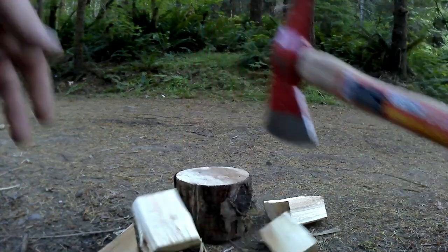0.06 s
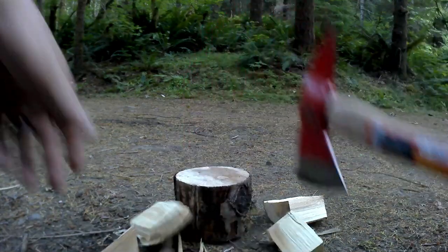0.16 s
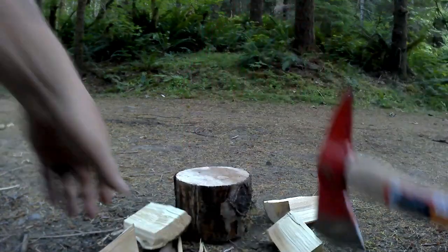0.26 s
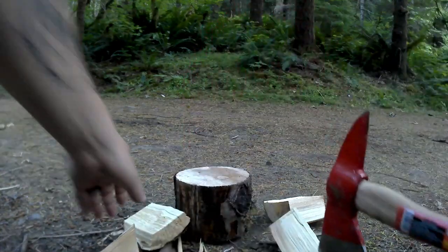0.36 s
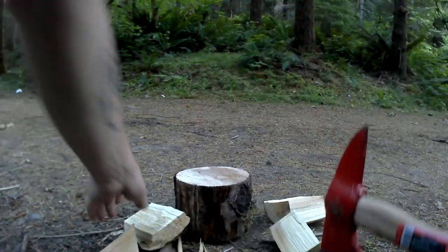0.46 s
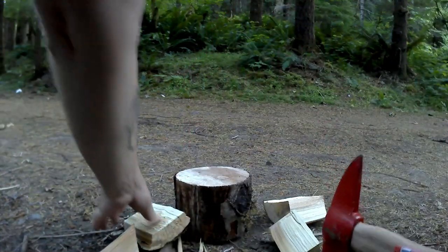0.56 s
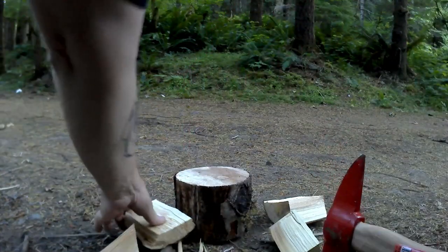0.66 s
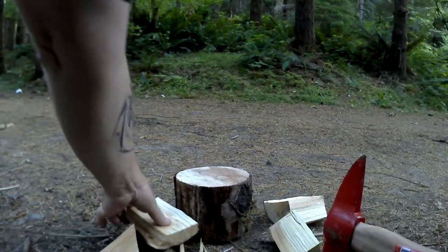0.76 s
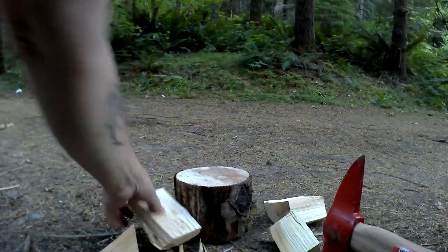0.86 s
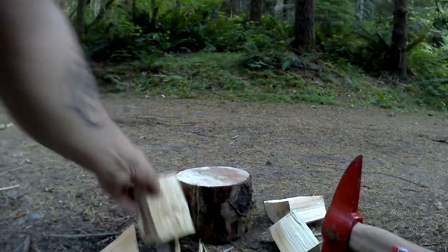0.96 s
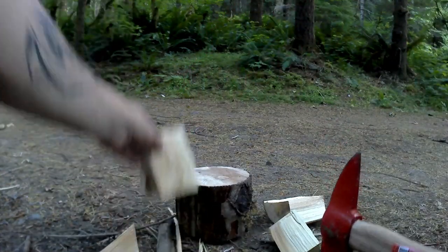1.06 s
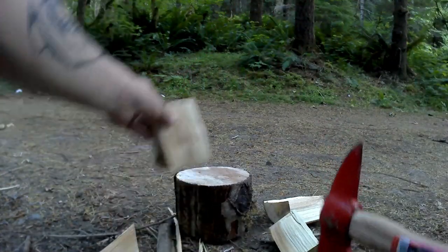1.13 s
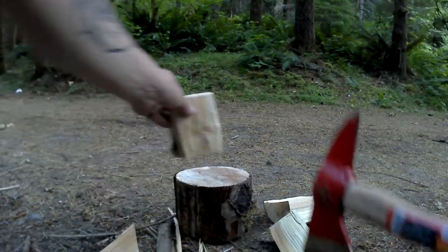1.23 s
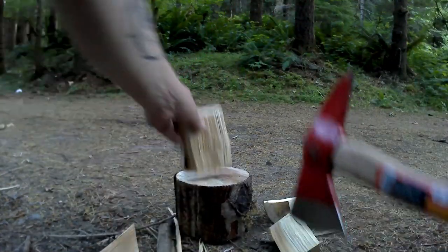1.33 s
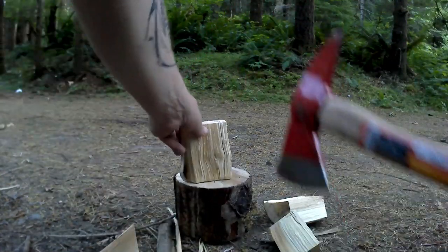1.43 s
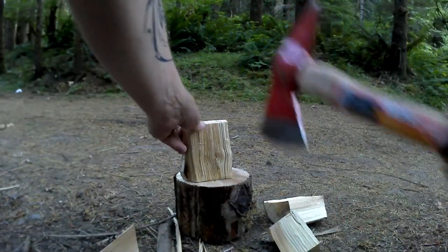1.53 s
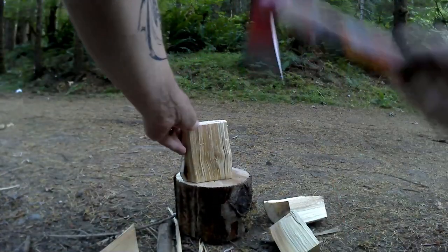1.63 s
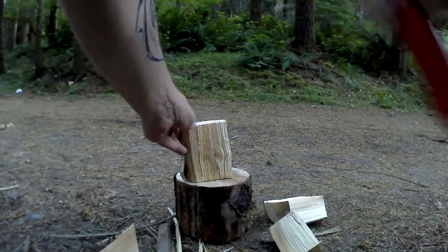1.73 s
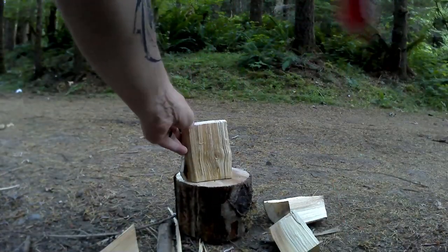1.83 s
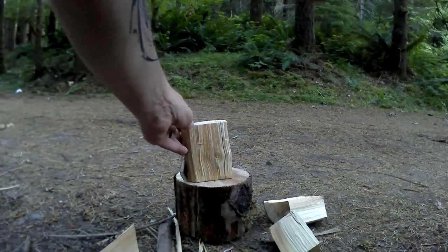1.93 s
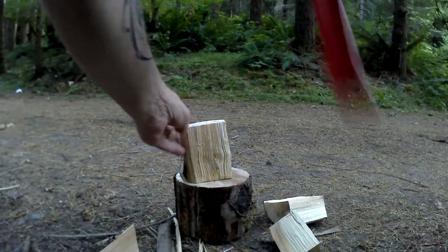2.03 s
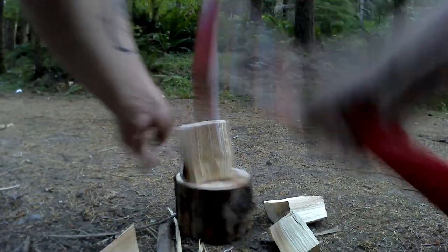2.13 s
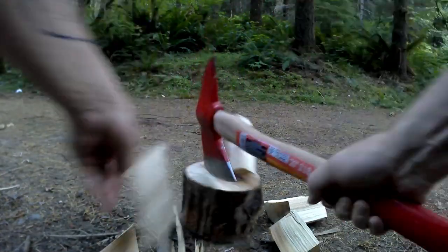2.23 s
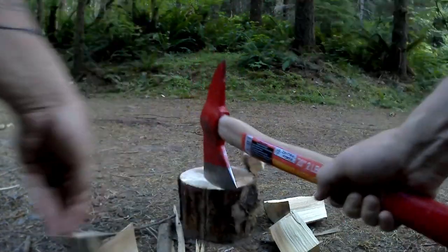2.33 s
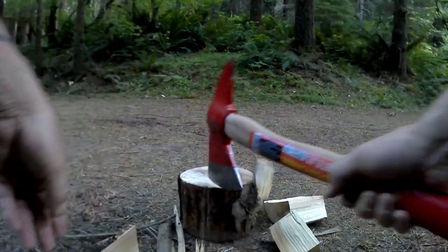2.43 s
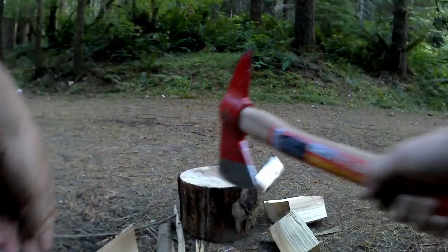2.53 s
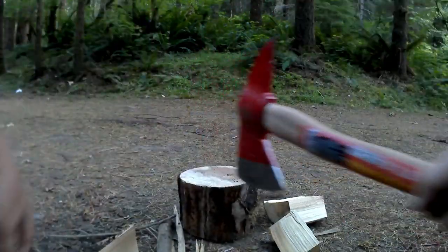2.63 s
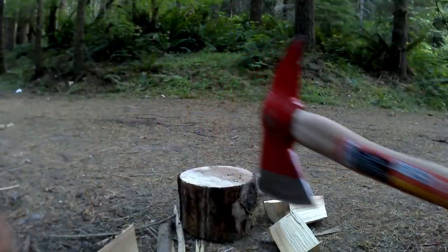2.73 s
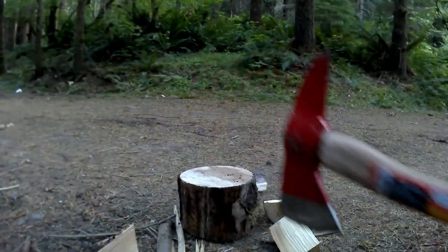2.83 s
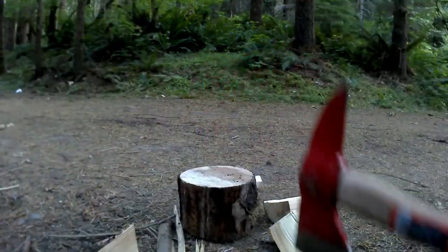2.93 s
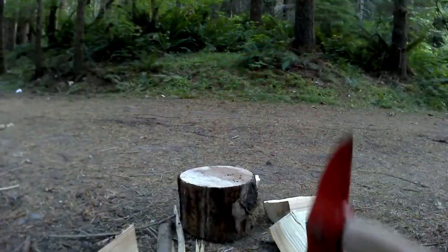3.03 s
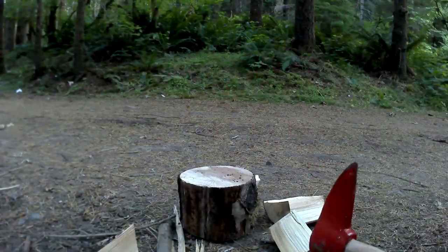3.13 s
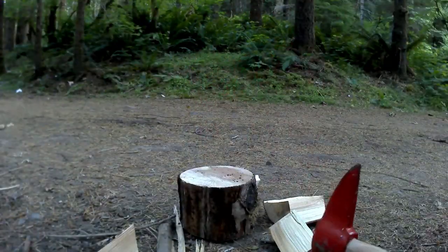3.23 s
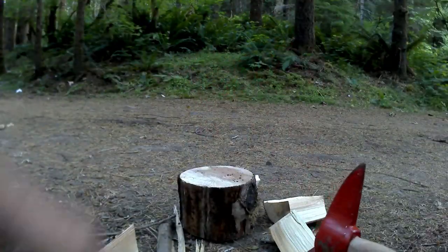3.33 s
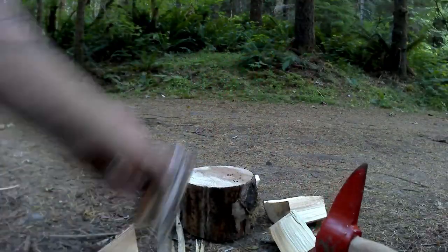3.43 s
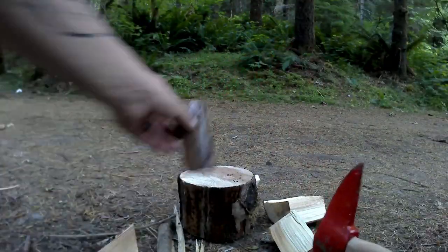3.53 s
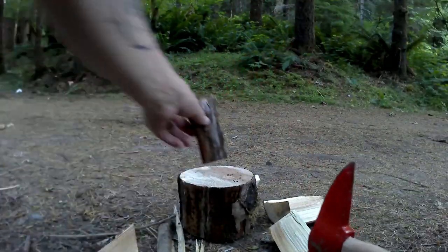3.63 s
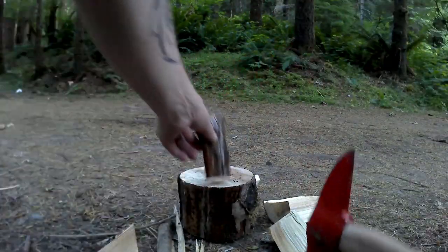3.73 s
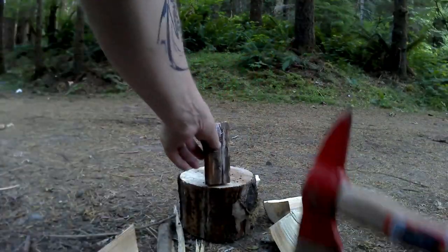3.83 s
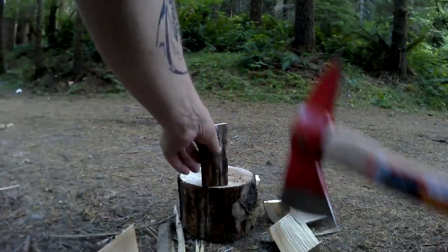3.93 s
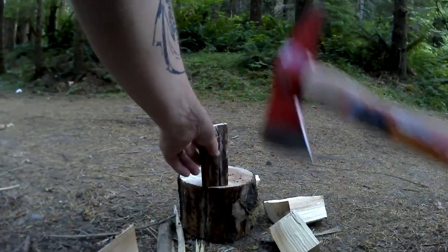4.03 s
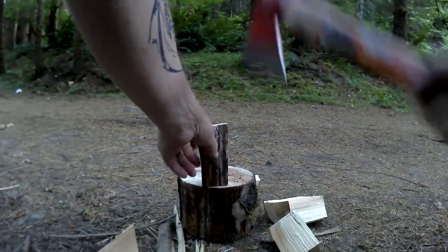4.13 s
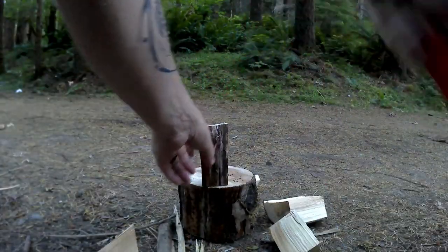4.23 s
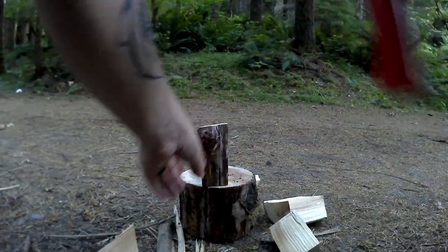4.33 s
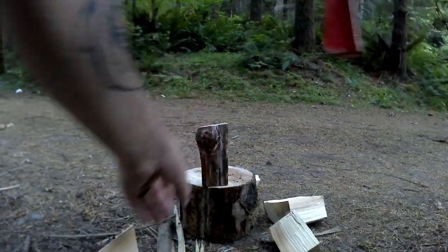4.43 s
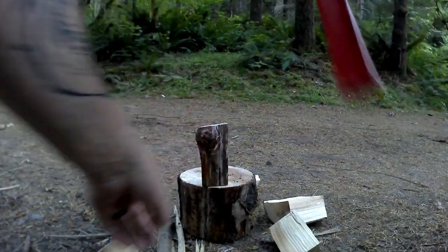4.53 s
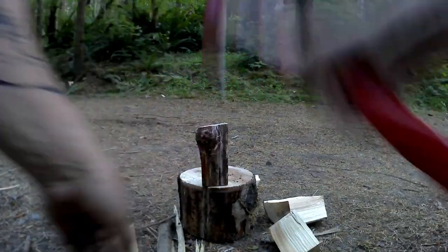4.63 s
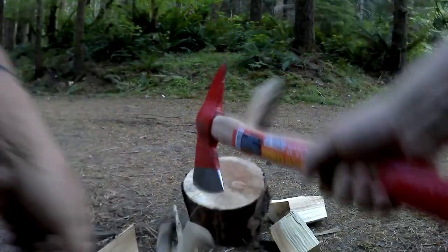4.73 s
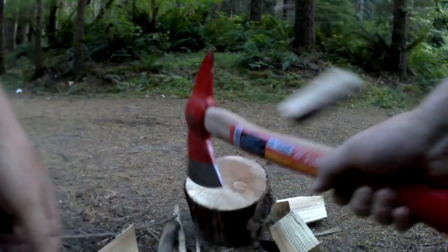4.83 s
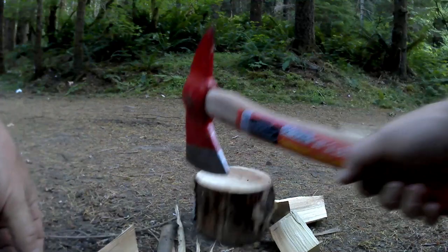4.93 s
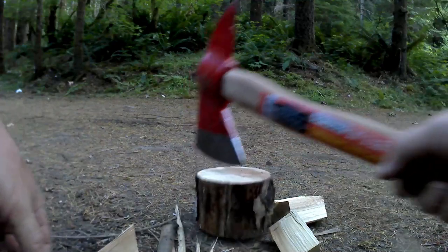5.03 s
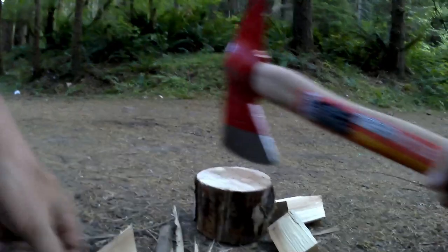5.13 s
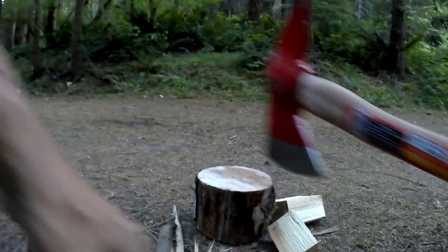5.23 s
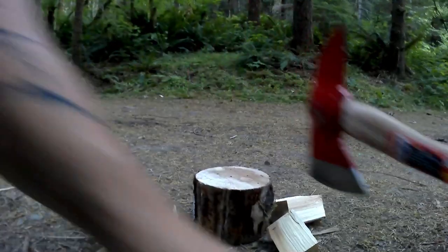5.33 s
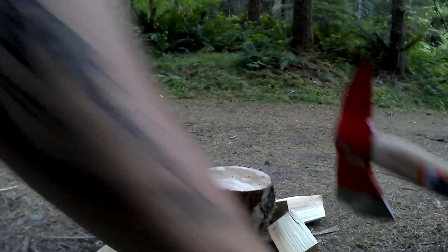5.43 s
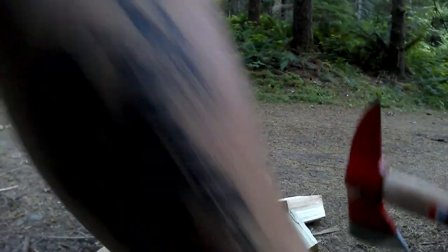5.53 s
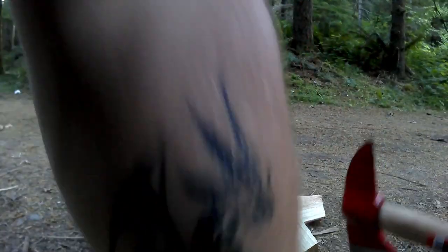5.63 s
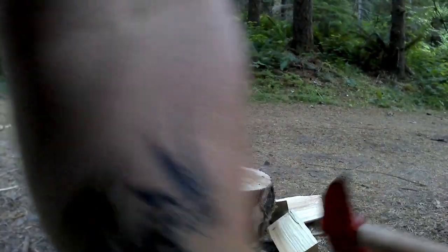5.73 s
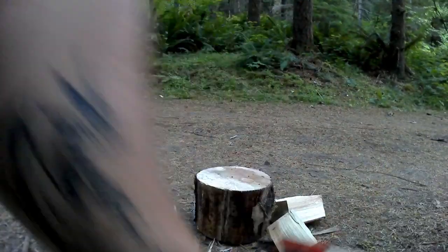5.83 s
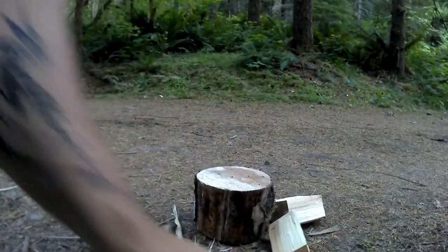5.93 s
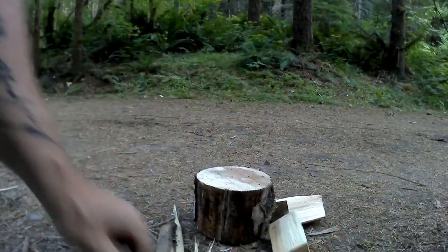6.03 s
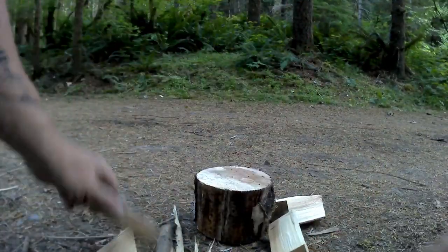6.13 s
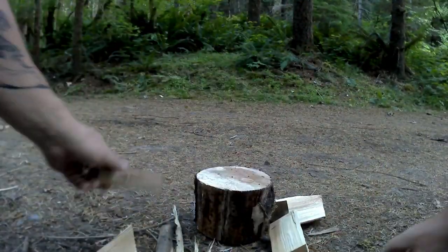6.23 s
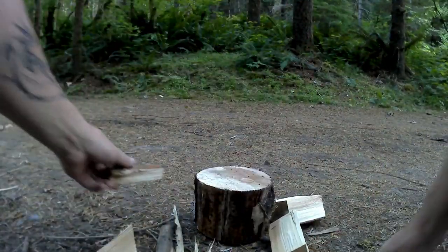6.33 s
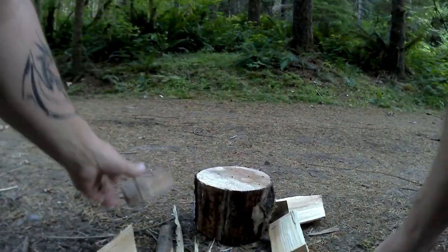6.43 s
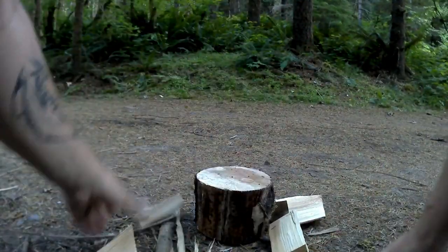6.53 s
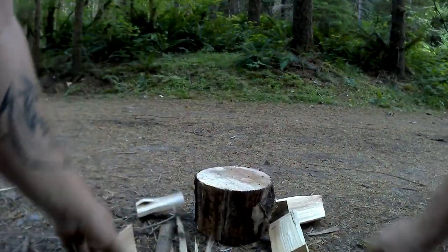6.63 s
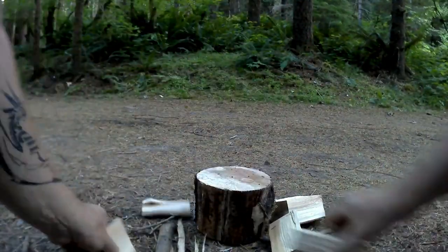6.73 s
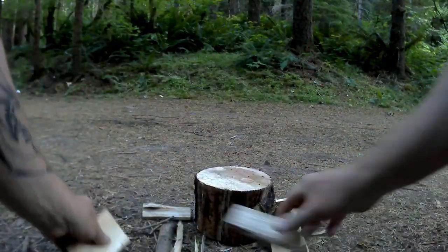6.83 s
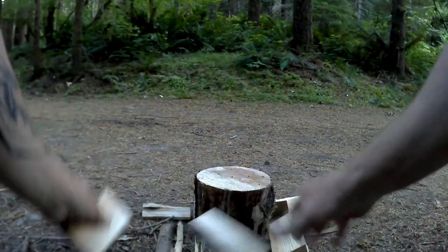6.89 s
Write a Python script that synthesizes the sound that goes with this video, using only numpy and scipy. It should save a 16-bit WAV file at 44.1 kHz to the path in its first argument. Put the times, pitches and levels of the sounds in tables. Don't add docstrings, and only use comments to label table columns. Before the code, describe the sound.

A quiet forest clearing with a faint, dull, grainy hush, heard through a cheap close microphone with rough digital texture. In the first 0.5 s a few wood pieces knock and settle; light scuffs and handling taps follow, with a small dry snap near 1.3 s. At about 2.1 s a hatchet bites and lands in a log block: a hard, short, hollow crack-thud, clipped. Halves drop and tumble until about 2.8 s, then near silence with tiny taps. At 4.6 s a second chop hits, with a brief steel ping, quick block knocks and low stand shake; pieces bounce at 4.8-4.9 s. At 5.0 s a piece crashes against the stand, loud and close, rattling with a low rumble. From 5.5 s, scuffs and soft knocks, a strong clack with a muted ping at 5.9 s, then kindling clatter and dry snaps to 7 s.

```python
import sys
import numpy as np
from scipy import signal
from scipy.fft import rfft, irfft, next_fast_len
from scipy.io import wavfile
from scipy.ndimage import uniform_filter1d, map_coordinates

SR = 44100
rng = np.random.default_rng(int(sys.argv[2]) if len(sys.argv) > 2 else 0)


def gain_from_decibels(decibels):
    exponent = np.asarray(decibels, float) / 20
    return 10 ** exponent


def generate_wav(signal):
    frames = np.transpose(np.atleast_2d(signal))
    scaled = np.clip(frames, -1, 1) * 32767
    pcm = np.round(scaled).astype(np.int16)
    wavfile.write(sys.argv[1], SR, pcm)


N = 306936


def unit(x):
    return x / np.sqrt(np.mean(x ** 2) + 1e-20)


def along(points, hz):
    f, v = np.transpose(points)
    return np.interp(np.log(hz + 1), np.log(f + 1), v)


def wobble(rate):
    knots = rng.standard_normal(int(N * rate / SR) + 4)
    return map_coordinates(knots, [np.arange(N) * rate / SR])


def coloured(x, points):
    m = next_fast_len(N + 8192)
    gain = gain_from_decibels(along(points, np.fft.rfftfreq(m, 1 / SR)))
    return irfft(rfft(x, m) * gain, m)[:N]


def dulled(noise, hz):
    lowpass = signal.butter(2, np.clip(hz, 100, 9000), fs=SR, output="sos")
    return unit(signal.sosfilt(lowpass, noise))


def decay(t, t60, attack):
    return gain_from_decibels(-60 * t / t60) * (1 - np.exp(-t / attack))


def ring(t, hz, t60, attack):
    return np.sin(2 * np.pi * hz * t) * decay(t, t60, attack)


def add(track, s, sound):
    part = track[round(s * SR):][:len(sound)]
    part += sound[:len(part)]


def knocks(contacts, lift_db, edge_life, crack_db, thud_db, lag):
    out, t = np.zeros(N), np.arange(SR // 8) / SR
    for s, db, body_hz, edge_hz, edge_db, t60 in contacts:
        u, noise = rng.uniform(-1.3, 1, 4), rng.standard_normal((2, len(t)))
        body = ring(t, body_hz, t60, 0.00059)
        body += 0.36 * ring(t, body_hz * (1.6 + 0.53 * u[0]), 0.43 * t60, 0.0019)
        body += 0.3 * ring(t, body_hz * (0.62 + 0.1 * u[1]), 0.7 * t60, 0.001)

        dull = dulled(noise[0], 1.4 * body_hz)
        dull = dull - uniform_filter1d(dull, size=120)
        body += gain_from_decibels(thud_db) * dull * decay(t, 1.37 * t60, 0.0004)

        edge = ring(t, edge_hz, edge_life * t60, 0.00028)
        edge += 0.55 * ring(t, edge_hz * (0.66 + 0.03 * u[2]), edge_life * t60, 0.00047)

        sharp = dulled(noise[1], 1.34 * edge_hz)
        sharp = sharp - uniform_filter1d(sharp, size=50)
        crack = gain_from_decibels(crack_db) * sharp * decay(t, 0.97 * t60, 0.00092)

        contact = body + gain_from_decibels(edge_db) * (edge + crack)
        add(out, s + lag + 0.0011, -gain_from_decibels(db + lift_db) * contact)
    return out


def blunt(table, edge_hz, t60):
    spread = 1 + 0.15 * rng.uniform(-1.5, 1, len(table))
    return [(s, db, hz, edge_hz * k, edge_db, t60) for (s, db, hz, edge_db), k in zip(table, spread)]


def keen(table, body_hz, t60):
    return [(s, db, body_hz, hz, edge_db, t60) for s, db, hz, edge_db in table]


# start in [s], peak in [dB], edge pitch in [Hz], edge over body in [dB].
BLADE_BITES = [(2.058, -12.5, 1010, 12.5), (2.0625, -22, 1910, 16.5), (2.0765, -12, 809, 0),
               (2.0785, -31, 2120, 11), (2.0905, -17.5, 1108, 0), (4.587, -11, 1620, 9.5),
               (4.594, -8.5, 1250, -11.5), (4.67, -14.5, 1460, 9), (4.6745, -23.5, 1320, 1)]
# start in [s], peak in [dB], body in [Hz], edge over body in [dB].
BLOCK_LANDINGS = [
    (2.092, 5, 329.4, -14.5),
    (2.0978, -3, 323, -11),
    (4.5905, 2, 348, -13.5),
    (4.599, -13.5, 233, -15),
    (4.634, -9, 391.2, -19),
    (4.6535, -16.5, 260, -28),
    (4.66, -16, 328, -20),
]
# start in [s], peak in [dB], body in [Hz], edge over body in [dB].
BLOCK_AFTERRING = [
    (2.103, -23.5, 337, -10.5),
    (4.607, -23, 354, -5),
    (5.011, -10.5, 333, -1),
]


def chops():
    contacts = keen(BLADE_BITES, body_hz=474, t60=0.021)
    contacts += blunt(BLOCK_LANDINGS, edge_hz=750, t60=0.022)
    contacts += blunt(BLOCK_AFTERRING, edge_hz=1000, t60=0.088)
    return knocks(contacts, lift_db=2.1, edge_life=0.4, crack_db=-4.5, thud_db=-8.5, lag=0)


# start in [s], level in [dB].
HEAD_RINGS = [(.48, -55.5), (4.592, -20.5), (4.612, -29), (4.636, -33), (5.914, -27.5), (5.975, -42),
              (6.09, -33)]
# pitch in [Hz], level in [dB], t60 in [s].
HEAD_MODES = [(2120, 0, .09), (2210, -3, .05), (3050, -11, .07)]


def steel():
    out, t = np.zeros(N), np.arange(SR // 4) / SR
    for s, db in HEAD_RINGS:
        for hz, level, t60 in HEAD_MODES:
            add(out, s, gain_from_decibels(db + level + rng.normal(0, 1)) * ring(t, hz, t60, 0.00022))
    return out * gain_from_decibels(2.5 * wobble(250))


# start in [s], peak in [dB], body in [Hz], edge over body in [dB].
STAND_CRASH = [(5.0, -3, 526, -0.05), (5.007, -1, 302, -5.5), (5.02, 0.5, 502, -14.5),
               (5.028, -9.5, 440, 0.7), (5.036, -7, 414.5, -13.5), (5.042, -7.5, 376.6, -12),
               (5.052, -9, 451, -11), (5.067, -14.5, 483, -7.5), (5.075, -17.5, 760, -16.5),
               (5.09, -25, 520, -18.5), (5.107, -21, 697, -9.5), (5.121, -39, 289.6, 0.5)]
# start in [s], peak in [dB], edge in [Hz], edge over body in [dB].
SPLINTER_TICKS = [(4.987, -24, 1300, 11.5), (5.012, -15.5, 1680, 12), (5.021, -15, 1500, 8),
                  (5.029, -16, 1260, 4.5), (5.044, -20, 1390, 4.5), (5.053, -28.5, 1400, 7),
                  (5.067, -26, 1790, 4), (5.141, -35.5, 1160, 13)]


def crash():
    contacts = blunt(STAND_CRASH, edge_hz=1250, t60=0.034)
    contacts += keen(SPLINTER_TICKS, body_hz=587, t60=0.0087)
    return knocks(contacts, lift_db=1.3, edge_life=0.51, crack_db=-4.0, thud_db=-10.5, lag=0.0011)


# start in [s], peak in [dB], body in [Hz], edge over body in [dB].
DAMPED_TAPS = [(.0455, -14.5, 626, -3), (.221, -47, 250, -18), (.332, -37.5, 500, -7),
               (.655, -57.5, 482, 5), (1.322, -34.5, 490, -26), (2.243, -30.5, 900, -0.5),
               (2.256, -24.5, 367, -15), (2.369, -15, 350, -20), (2.377, -31, 474, -0.5),
               (2.651, -25.5, 342, -13.5), (3.02, -34.5, 360, -8.5), (4.813, -40, 451.6, -10),
               (4.912, -14.5, 358, -24.5), (4.924, -20.5, 500, -4), (5.502, -38.5, 386, -2.5),
               (5.514, -20, 356, -46), (5.674, -29.5, 464, -34), (6.052, -40.5, 290, -0.5),
               (6.186, -47.5, 785, 13), (6.198, -37, 300, 0), (6.357, -32.5, 620, -28),
               (6.602, -29.5, 400, -16), (6.711, -38, 324, -24), (6.792, -44, 239, -21)]
WOOD_CLATTER = [(.148, -33.5, 820, -10), (.173, -27.5, 350, -4), (.21, -21, 307, -7.5),
                (.474, -43.5, 406, 3.5), (.842, -50, 408, -5), (.861, -39, 395, -3), (.997, -44, 348, -11),
                (2.22, -32.5, 285, -5), (2.517, -17.5, 494, -36), (2.606, -25.5, 541, -22),
                (2.765, -42.5, 334, -22.5), (3.696, -39, 358, -7.5), (4.789, -32.5, 560, -35.5),
                (4.8685, -9.5, 219.7, -15), (5.556, -38, 730, -8), (5.643, -26, 248, -12),
                (5.941, -40.5, 490, 5.5), (6.092, -21, 236, -9), (6.114, -33, 287, -16),
                (6.145, -34, 570, -5.5), (6.372, -33, 540, -32), (6.451, -20.5, 396, -30),
                (6.558, -39, 510, -25)]
FREE_ROLLS = [(1.352, -48, 433, -4), (2.534, -38.5, 493, -28), (2.636, -41, 308, -7),
              (3.078, -48.5, 330.7, 0), (5.798, -41, 490, -9), (5.875, -28, 432, -6),
              (5.97, -31.5, 285, -8.5), (6.089, -31.5, 407, -10), (6.927, -28, 431, -1.5)]


def loose_wood():
    contacts = blunt(DAMPED_TAPS, edge_hz=1150, t60=0.019)
    contacts += blunt(WOOD_CLATTER, edge_hz=1050, t60=0.036)
    contacts += blunt(FREE_ROLLS, edge_hz=1000, t60=0.079)
    return knocks(contacts, lift_db=0.51, edge_life=0.55, crack_db=-1.5, thud_db=-10.5, lag=0.001)


# start in [s], peak in [dB], edge in [Hz], edge over body in [dB].
DRY_SNAPS = [(.039, -21.5, 910, -18), (3.075, -52, 1900, 6), (3.105, -51, 2190, 2), (4.8, -44.5, 2300, 3.5),
             (1.2825, -29.5, 1740, 9.5), (5.911, -9, 927, -4), (6.4355, -24.5, 2740, -2.5),
             (6.5, -43.5, 2600, 12.5), (6.507, -32.5, 1210, -19), (6.901, -36.5, 1740, 2.5),
             (6.9215, -19, 2333, 7), (6.953, -36, 2540, -6)]


def snaps():
    contacts = keen(DRY_SNAPS, body_hz=413.3, t60=0.023)
    return knocks(contacts, lift_db=-2.5, edge_life=0.69, crack_db=0.77, thud_db=-2.2, lag=0.00098)


# start in [s], level in [dB], t60 in [s].
STAND_JOLTS = [(2.058, -13.5, 0.068), (3.02, -41.5, 0.214), (2.09, -35, 0.24), (4.591, -7, 0.066),
               (4.872, -33, 0.17), (5.002, -5, 0.28), (5.037, -8.5, 0.14), (5.597, -33.5, 0.37),
               (5.624, -34, 0.17), (5.656, -36.5, 0.24), (5.975, -33, 0.14)]
# pitch in [Hz], level in [dB], share of the jolt's t60 in [ratio].
STAND_MODES = [(36, -17.5, 3.5), (83.8, -9, 0.82), (122.6, 4, 0.67), (154, 3.5, 0.28), (206, -4.5, 0.63)]


def stand():
    out, t = np.zeros(N), np.arange(SR) / SR
    for s, db, t60 in STAND_JOLTS:
        for hz, level, share in STAND_MODES:
            add(out, s, gain_from_decibels(db + level) * ring(t, hz, share * t60, 0.0018))
    return out * gain_from_decibels(0.87 * wobble(37))


# start in [s], scuff in [dB], rumble in [dB], hold in [s].
NEEDLE_SCUFFS = [(0, -56, -49.5, 0.31), (0.56, -66.5, -59.5, 0.38), (1.396, -59, -50.5, 0.029),
                 (2.137, -55.5, -56.5, .36), (2.619, -54, -43.5, 0.026), (3.06, -57, -49.5, 0.069),
                 (3.827, -72, -56, .06), (4.702, -55, -56.5, .14), (5.044, -52, -32.5, 0.025),
                 (5.2, -57, -46.5, .15), (5.57, -55, -46, 0.082), (5.681, -57, -37.5, 0.035),
                 (5.856, -57, -46, 0.16), (6.043, -54.5, -44.5, 0.096), (6.299, -58.5, -54.5, 0.38)]


def scuffing():
    s, scuff_db, rumble_db, hold = np.transpose(NEEDLE_SCUFFS)[:, :, None]
    t = np.arange(0, N, 64) / SR
    rise_db_per_s, fall_db_per_s, rumble_faster = 77.5, 61, 1.8
    away_db = rise_db_per_s * np.maximum(s - t, 0)
    away_db = away_db + fall_db_per_s * np.maximum(t - s - hold, 0)

    def total(db, still_db):
        power = gain_from_decibels(2 * still_db) + gain_from_decibels(2 * db).sum(axis=0)
        return np.interp(np.arange(N) / SR, t, 10 * np.log10(power))

    return total(scuff_db - away_db, -66.5), total(rumble_db - rumble_faster * away_db, -59.5)


# pitch in [Hz], density in [dB per Hz].
HUSH_COLOUR = [(88, -28), (150, -4), (297, -6), (813, -9), (1870, -15), (3900, -23), (5070, -51),
               (8580, -120)]
# pitch in [Hz], density in [dB per Hz].
RUMBLE_COLOUR = [(12, -31.5), (20, 7.5), (49, -8), (93, -9), (119, -12.5), (200, -31), (260, -55),
                 (440, -120)]


def ground():
    scuff_db, rumble_db = scuffing()
    hush_db = -60.5
    effort = np.clip((scuff_db - hush_db) / 9, 0, 1)
    grains = gain_from_decibels(effort * (3 * wobble(160) + 4 * wobble(35)) + 0.4 * wobble(20))
    hush = unit(coloured(grains * rng.standard_normal(N), HUSH_COLOUR))
    rumble = unit(coloured(rng.standard_normal(N), RUMBLE_COLOUR) * gain_from_decibels(3.4 * wobble(19)))
    return gain_from_decibels(scuff_db + 3.0) * hush + gain_from_decibels(rumble_db + 1.4) * rumble


# pitch in [Hz], t60 in [s].
TREE_TAIL = [(200, 0.26), (1000, 0.14), (4000, 0.17)]


def trees(x):
    hz, t, z = signal.stft(rng.standard_normal(SR // 2), SR, nperseg=256)
    fading = gain_from_decibels(-60 * t / along(TREE_TAIL, hz)[:, None])
    dull = (hz < 4000)[:, None]
    tail = signal.istft(z * fading * dull, SR, nperseg=256)[1]
    return signal.fftconvolve(x, tail / np.linalg.norm(tail))[:N]


def scene():
    wood = chops() + steel() + crash() + loose_wood() + snaps()
    return (wood + gain_from_decibels(-31.5) * trees(wood) + stand() + ground())[None]


# pitch in [Hz], response in [dB].
MIC_RESPONSE = [(20, -4), (1500, 0.5), (2500, -2.5), (3500, -5), (3950, -3.5)]


def microphone(x):
    return coloured(x, MIC_RESPONSE + [(4100, -88)])


# time in [s], clipping level in [full scale].
OVERLOAD_CEILING = [(0, .32), (2.07, .32), (2.09, .38), (4.6, .32), (4.67, .4), (4.99, .79), (7, .79)]


def overload(x, seconds):
    top = np.interp(seconds, *np.transpose(OVERLOAD_CEILING))
    return x / (1 + np.abs(x / top) ** 8) ** (1 / 8)


def camera_blocks(x, noise_db, ahead_db, after_db, own_db):
    to_edge = np.minimum(np.arange(288) + 0.5, 287.5 - np.arange(288))
    fade = np.sin(np.pi / 2 * np.clip(to_edge / 32, 0, 1))
    z = signal.stft(np.pad(x, (232, 0)), window=fade, nperseg=288, noverlap=32)[2]
    size = np.sqrt(np.abs(uniform_filter1d(np.abs(z) ** 2, size=10, axis=0)))
    grit = (rng.standard_normal(z.shape) + 1j * rng.standard_normal(z.shape)) / np.sqrt(2)

    bright = size[36:].mean(axis=0)
    ahead = gain_from_decibels(ahead_db) * (np.roll(bright, -1) - 2 * bright)
    after = gain_from_decibels(after_db) * (np.roll(bright, 1) - 2 * bright)
    own = gain_from_decibels(own_db) * size.max(axis=0)
    mask = np.max([ahead, after, own], axis=0)
    tilt = gain_from_decibels(np.linspace(-4, 7, len(z)))[:, None]
    kept = np.clip(2 * size / (tilt * mask + 1e-12) - 1, 0, 1)

    gritty = kept * (z + gain_from_decibels(noise_db) * size * grit)
    return signal.istft(gritty, window=fade, nperseg=288, noverlap=32)[1][232:][:len(x)]


def top_cut(x):
    return signal.sosfilt(signal.butter(12, 16410, fs=SR, output="sos"), x)


def record(dry):
    camera_sr = 8000
    fine = np.arange(N) / SR
    coarse = np.arange(N * camera_sr // SR + 2) / camera_sr
    x = np.interp(coarse, fine, microphone(dry[0]))
    x = overload(x, coarse)
    x = camera_blocks(x, noise_db=-18, ahead_db=-20, after_db=-25, own_db=-48)
    mix = np.interp(fine, coarse, x)[None]
    return top_cut(mix)


dry = scene()
out = record(dry)
generate_wav(out)
```